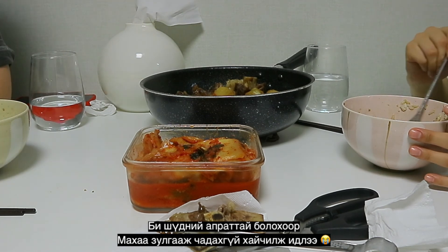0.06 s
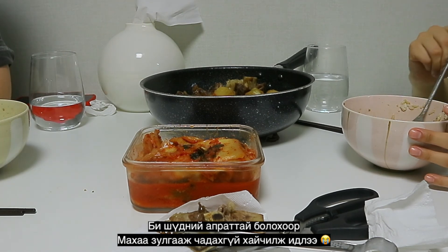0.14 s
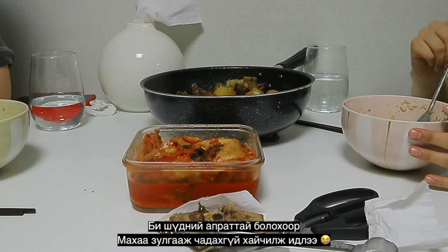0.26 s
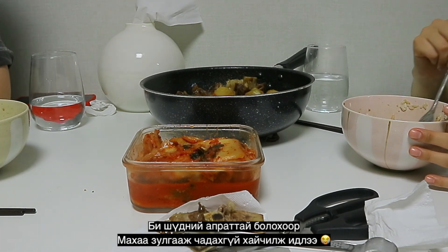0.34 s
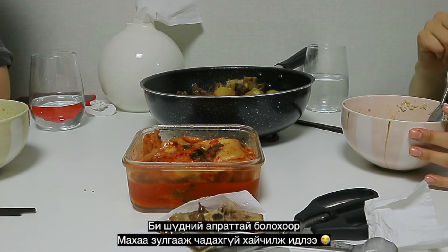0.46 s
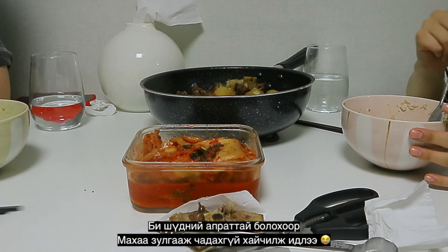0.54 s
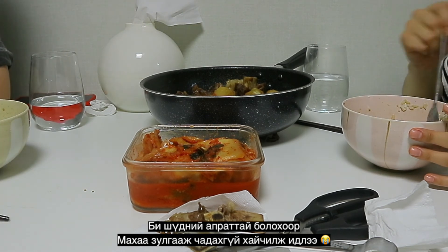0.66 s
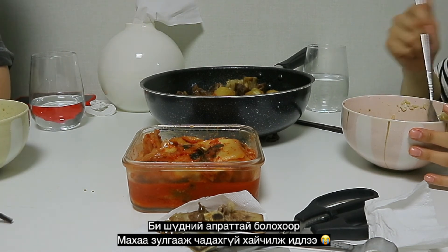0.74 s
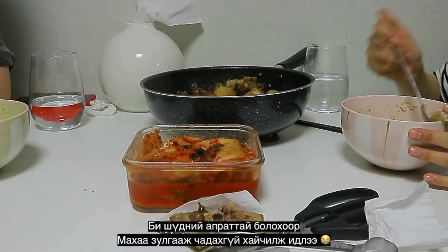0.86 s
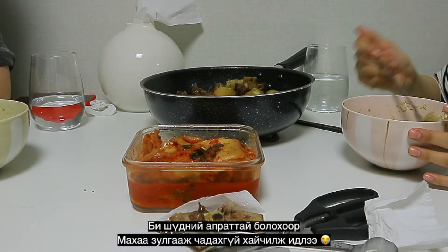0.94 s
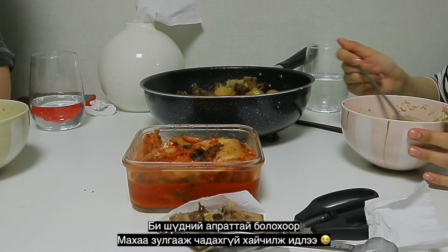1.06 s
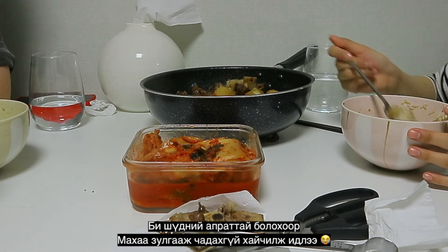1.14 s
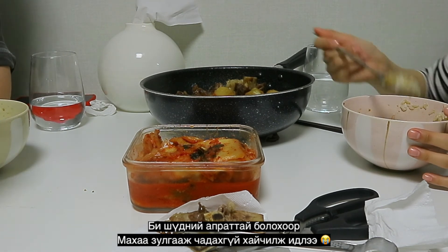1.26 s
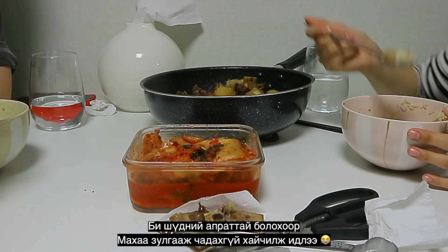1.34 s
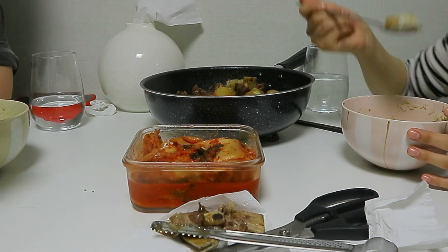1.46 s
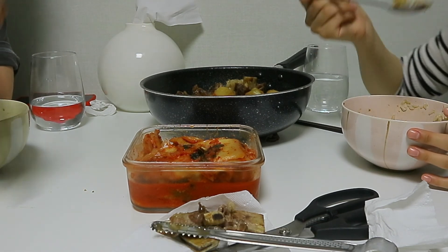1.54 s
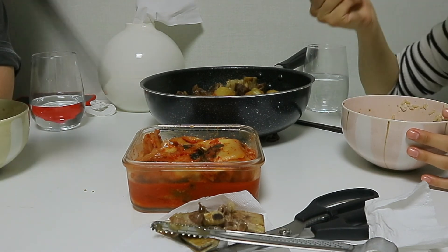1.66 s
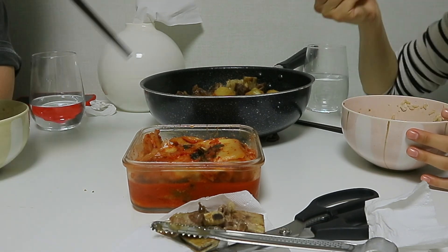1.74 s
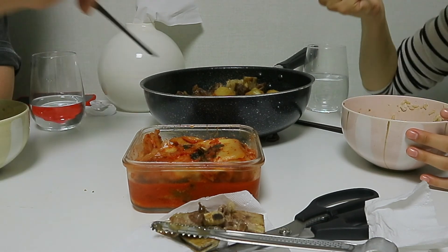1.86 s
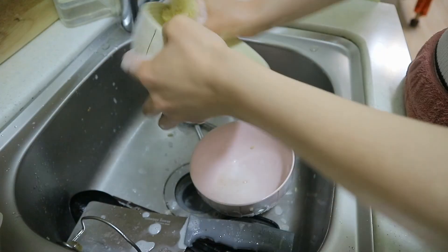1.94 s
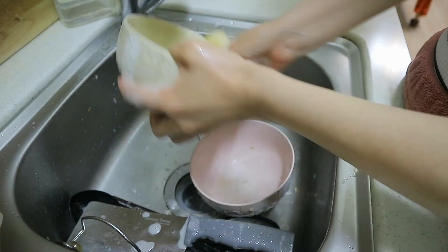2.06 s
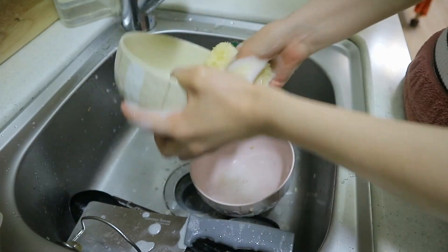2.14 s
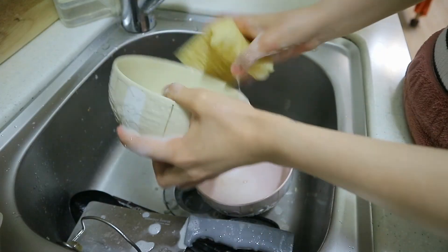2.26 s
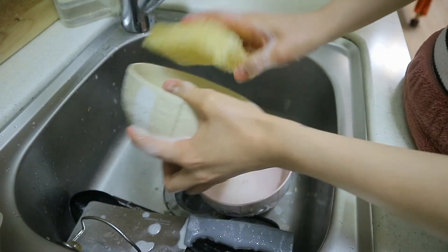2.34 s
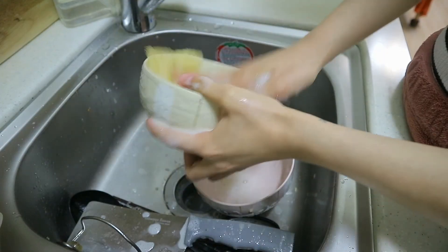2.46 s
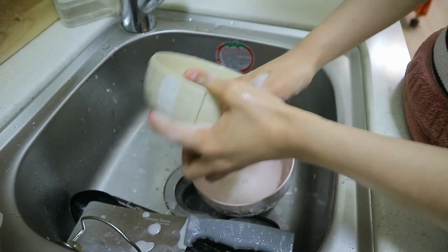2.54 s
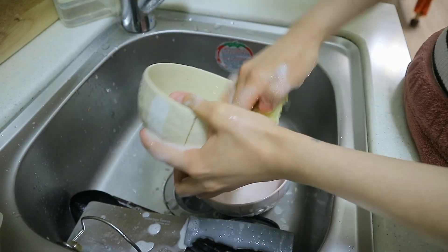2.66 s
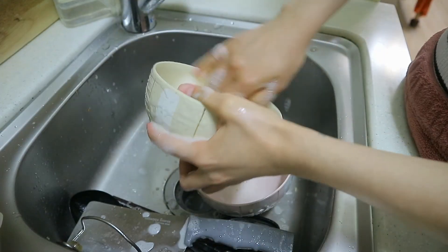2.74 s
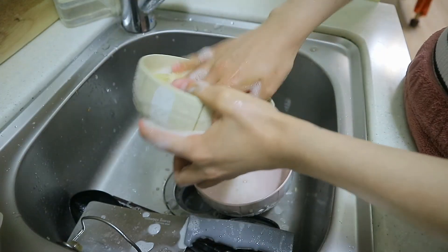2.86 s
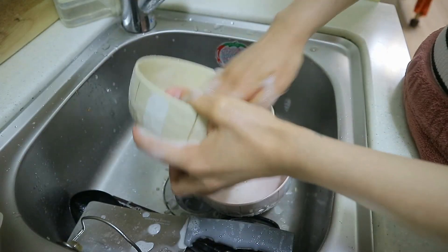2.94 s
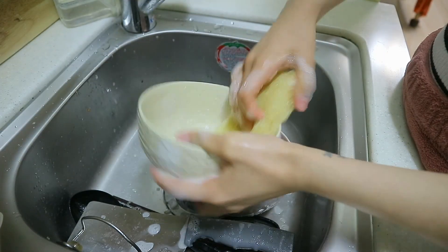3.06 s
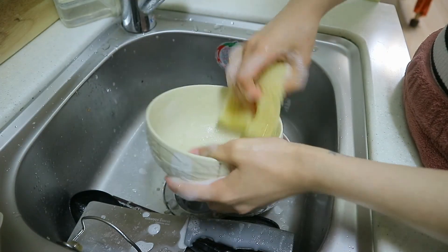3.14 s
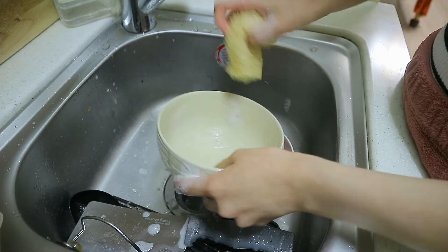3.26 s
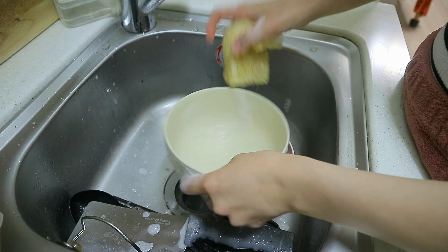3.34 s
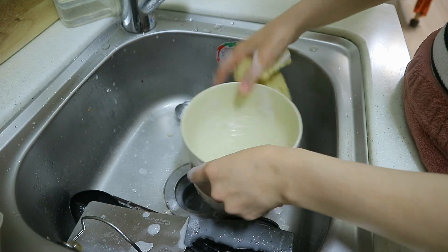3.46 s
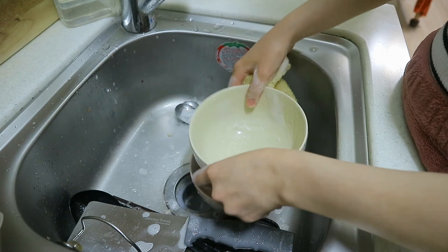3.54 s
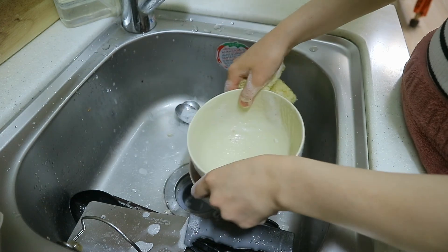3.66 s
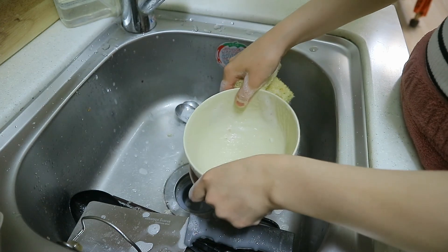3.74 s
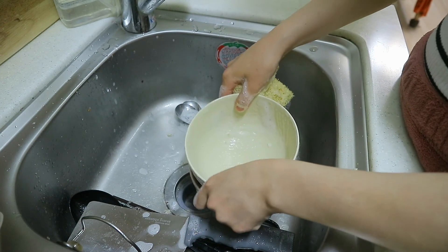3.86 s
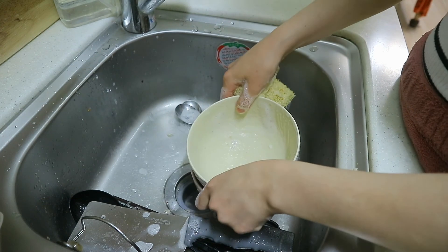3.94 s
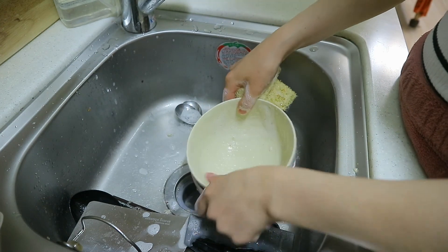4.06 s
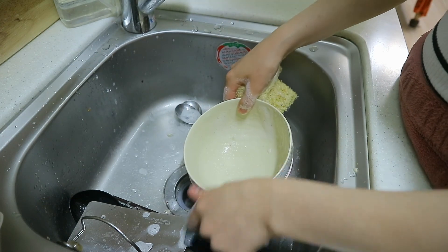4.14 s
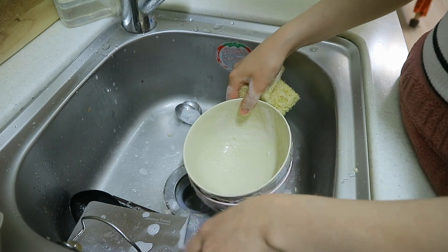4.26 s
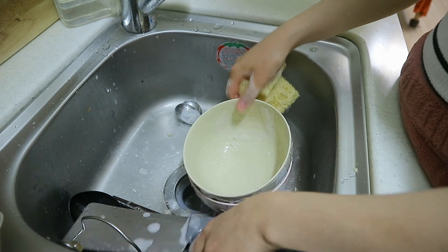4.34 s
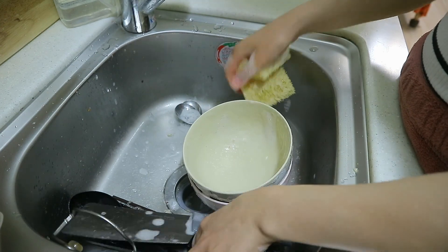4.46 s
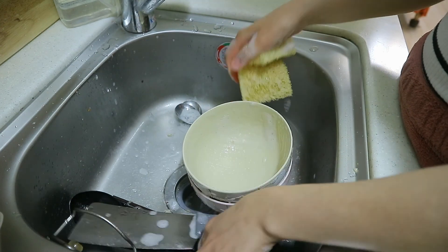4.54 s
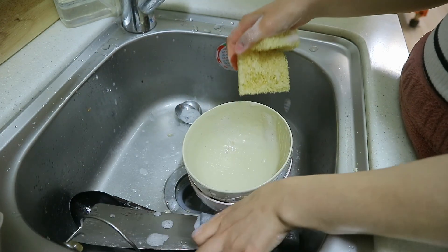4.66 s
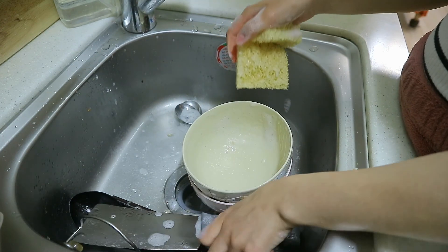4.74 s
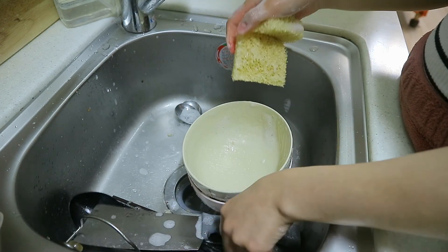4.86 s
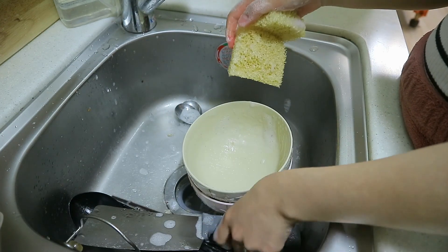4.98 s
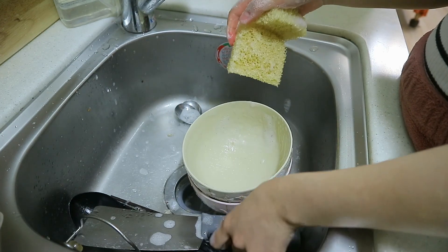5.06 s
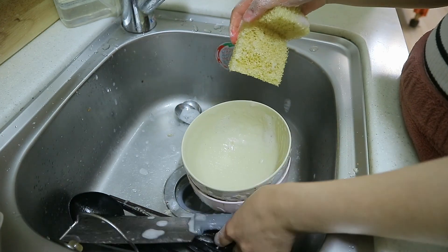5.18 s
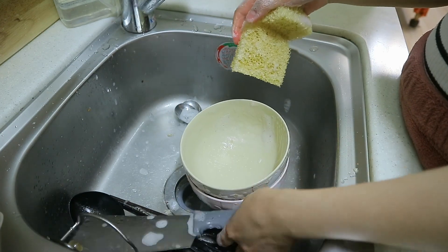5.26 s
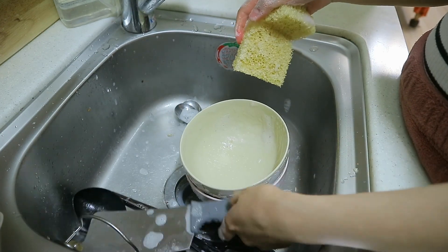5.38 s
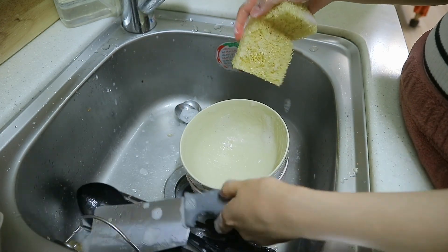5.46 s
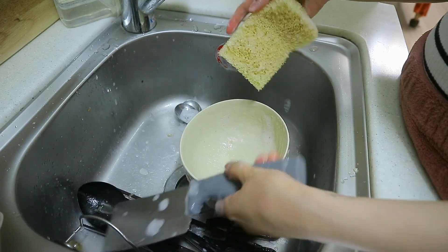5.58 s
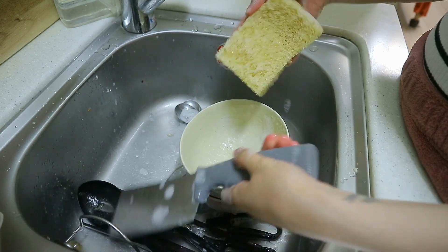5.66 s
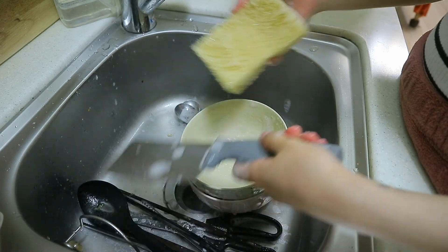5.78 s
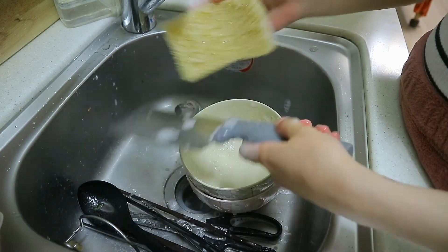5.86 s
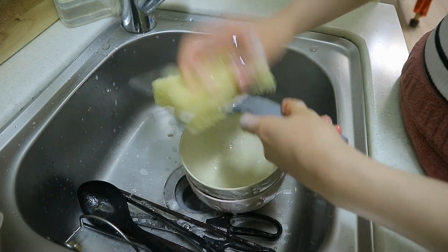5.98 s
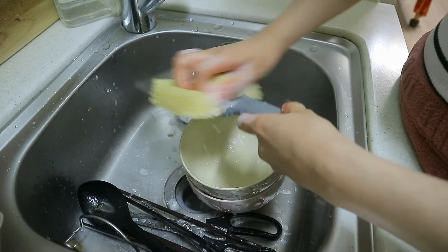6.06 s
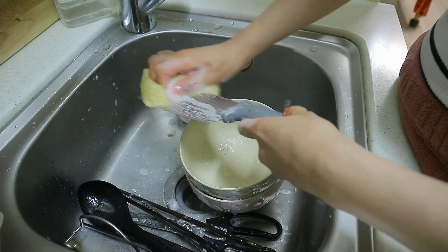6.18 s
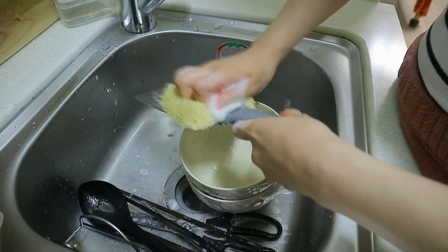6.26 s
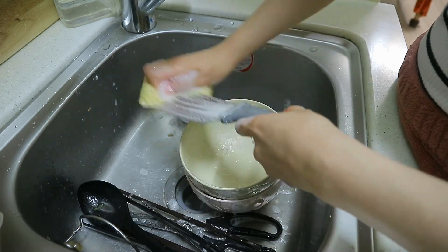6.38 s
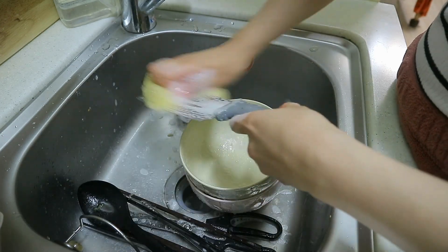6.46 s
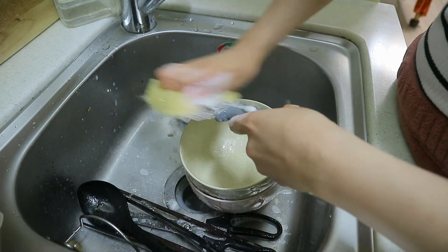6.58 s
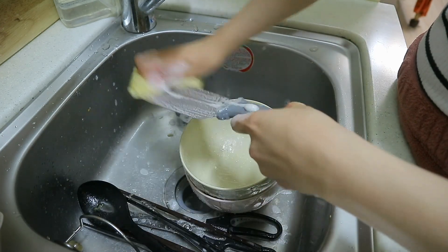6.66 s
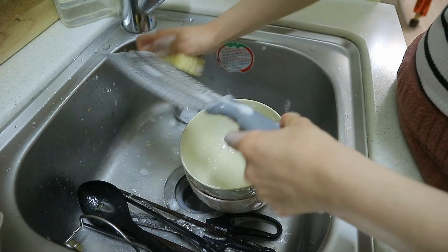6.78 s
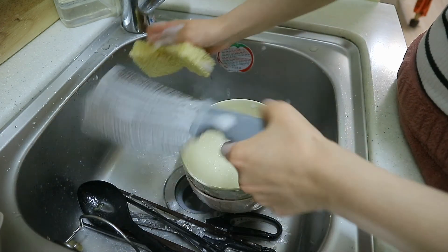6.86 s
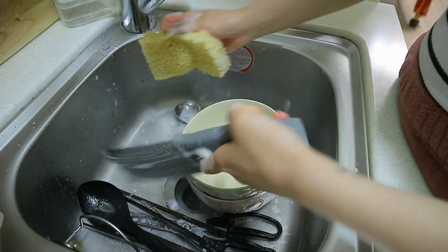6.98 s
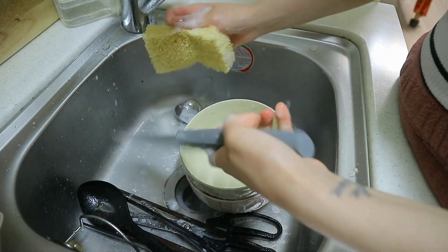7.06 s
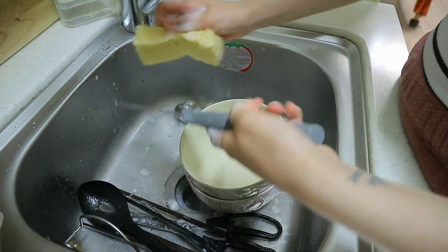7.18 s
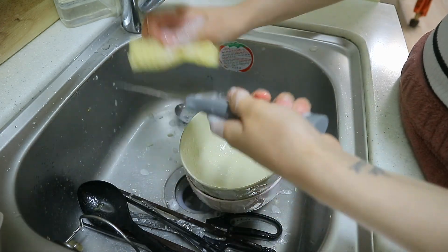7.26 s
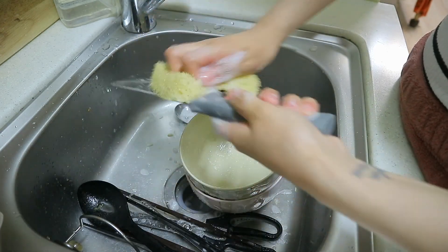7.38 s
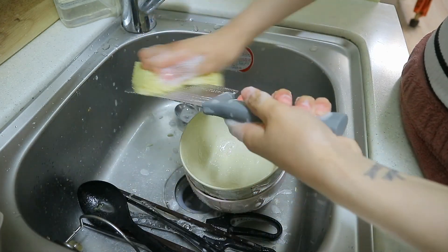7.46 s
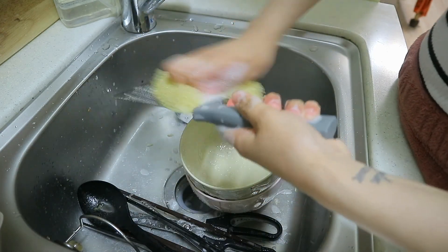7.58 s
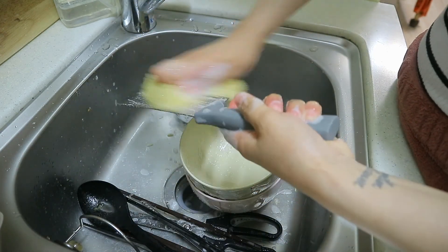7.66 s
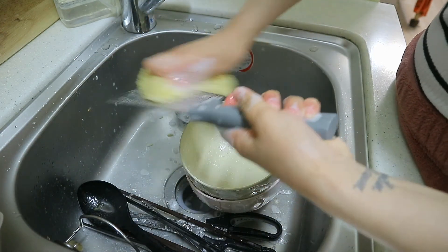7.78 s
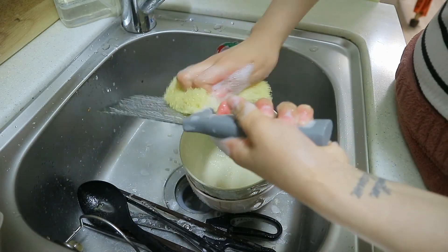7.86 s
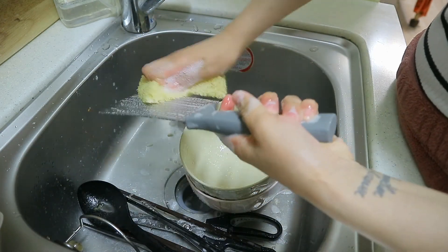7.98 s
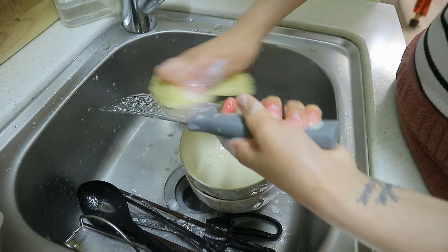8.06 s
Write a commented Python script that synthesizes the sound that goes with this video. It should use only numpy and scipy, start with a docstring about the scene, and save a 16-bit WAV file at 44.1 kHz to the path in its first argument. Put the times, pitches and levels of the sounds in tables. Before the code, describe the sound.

At a table in a small hard room, a fork briefly scrapes a china bowl, then steel tongs slide, squeal and clatter down in hard blows. Abruptly at a kitchen sink, a wet sponge softly wipes a bowl. Bowls clink sharply and settle, a knife drags through rattling utensils, its blade rings twice, and brisk sponge strokes scrub it. Close stereo microphone, faint room hush.

```python
"""Small, hard rooms heard through a close stereo pair: first a dining table, where a fork scrapes a ceramic
bowl and steel tongs clatter down. Then a steel sink, where a soapy sponge wipes a bowl, bowls are stacked,
a knife is dragged out from among the utensils, its blade rings, and the sponge scrubs it in quick strokes.
Blows are short noise bursts with decaying modes; scrapes are swells of tiny clicks that feed modes; the sponge
is bursting bubbles, filtered and pressed by the hand; squeaks are gliding tones; a faint hush lies beneath."""
import sys
import numpy as np
from scipy import signal
from scipy.fft import rfft, irfft, next_fast_len
from scipy.io import wavfile

SR = 44100
rng = np.random.default_rng(int(sys.argv[2]) if len(sys.argv) > 2 else 0)


def write(x):
    x = np.atleast_2d(x).T
    wavfile.write(sys.argv[1], SR, np.round(np.clip(x, -1, 1) * 32767).astype(np.int16))


N = 358091
TIME = np.arange(N) / SR
TOP_HZ = 15400  # upper limit of the sound
RING_SIZE = 28800  # samples in which one blow or stroke rings out
RING_T = np.arange(RING_SIZE) / SR

# ringing of the fork on china: (frequency [Hz], level [dB], t60 [s])
FORK_MODES = [(937, -15, 0.083), (1374, -18.5, 0.44), (2637, 4.5, 0.088), (4690, 5.5, 0.31),
              (4744, 2, 0.18), (7060, 1.5, 0.042), (7650, -15, 0.2), (8620, -14.5, 0.17), (9850, -15, 0.1),
              (11400, -15.5, 0.11)]
# lean of the table sounds, left minus right: (frequency [Hz], level [dB])
TABLE_BALANCE = [(500, 6.5), (1800, 1), (7000, 0.85)]
# ringing of a bowl: (frequency [Hz], level [dB], t60 [s])
BOWL_MODES = [(668, -10, .16), (1104, -13, .11), (1518, -13, .2), (1610, -7, .1), (1675, -2, .13),
              (2196, -13, .13), (2557, -5, .13), (2735, -3.5, .16), (2830, -5, .13), (3290, -17, .18),
              (3478, -17, .18), (4420, -15, .11), (4603, -8, .13), (4755, 2, .125), (4950, -9, .08),
              (7154, -22, .17), (7472, -30, .15), (9814, -26, .18), (10290, -30, .16)]
# the stack of bowls settles: (time [s], level [dB], brightness [dB/octave], ring [dB])
STACK_HITS = [(3.712, -28.5, 7, -24), (4.0916, -12, 0, -5), (4.152, -32, -3, -12)]
# ringing of the blade: (frequency [Hz], level when struck [dB], t60 when struck [s], level when scraped [dB])
BLADE_MODES = [(1052, -1, .9, -5), (1392, -10, .75, 0), (1884, -4, .23, 0), (2670, 1.5, .23, -17),
               (3478, -17, .19, -5), (3830, -14, .21, -6), (4694, -5, .17, -16), (4920, -6, .19, -2),
               (5669, -12, .13, -9), (5940, -30, .1, -8), (6476, -21, .2, -15), (7036, -16, .17, -12),
               (7510, -14, .11, -15), (8420, -20, .12, -16), (9290, -23, .17, -8), (10350, -28, .14, -13),
               (11000, -28, .15, -17), (11800, -34, .1, -19), (12800, -38, .1, -24)]
# the blade strikes and rings: (time [s], level [dB], brightness [dB/octave], ring [dB])
BLADE_HITS = [(5.4385, -13.5, -6, -6), (7.0708, -14.5, 0, -4.5)]
# colour of the blade's contacts: (frequency [Hz], level [dB])
DRAG_COLOUR = [(47, -25), (80, -17), (328, -5.5), (456, -6), (581, 8.5), (774, 0.5), (1030, 12.5),
               (1290, 3.5), (1400, 0), (1910, -1), (2600, -2.5), (4820, -6.5), (8740, -20.5), (9550, -24),
               (15500, -44)]
# ringing of the utensils: (frequency [Hz], level [dB], t60 [s])
UTENSIL_MODES = [(936, -7, 0.046), (1486, -0.5, 0.15), (1897, -3, 0.065), (2330, -5, 0.1),
                 (3610, -10.5, 0.068), (4340, -8.5, 0.082)]
# colour of squeezed foam and wet fingers: (frequency [Hz], level [dB])
SQUELCH_COLOUR = [(100, -25), (350, 0), (900, -9), (1900, -1.5), (2800, -10.5), (4300, -5), (6500, -20),
                  (15000, -36)]


def dining_table():
    """Fork and tongs share one small room, whose walls add a short tail."""
    return room(fork() + tongs(), wet_db=-7.5, t60=0.32, damping=0.029)


def fork():
    """Stick-slip clicks of the tines keep the china ringing, while the shaft judders at a slower rate."""
    # strokes: (time [s], length [s], level [dB], brightness [dB/octave], ring [dB])
    fork_scrapes = [(0, 0.076, -28.5, -3, 1.5), (.07, 0.27, -40, -3.5, -17.5), (.416, 0.11, -36, -3, -20)]
    # colour of the scrape: (frequency [Hz], level [dB])
    fork_colour = [(59, -75), (100, -32.5), (243, -25), (368, -7), (698, -25), (933, -9), (3810, -21),
                   (4780, -13.5), (5410, -35), (6930, -38), (14000, -69)]
    # low ringing of the shaft: (frequency [Hz], level [dB], t60 [s])
    shaft_modes = [(380, 16, 0.47), (943, -2, 0.29)]
    tines = rub(fork_scrapes, fork_colour, FORK_MODES, edge_s=0.003, rate=3300, spread_db=2.0)
    # one long shake under the first strokes, in the column order of fork_scrapes
    judder = [(0.0011, 0.37, -50, -17, 10)]
    shaft = rub(judder, fork_colour, shaft_modes, edge_s=0.0029, rate=180, spread_db=3.0)
    return aim(tines, TABLE_BALANCE) + pan(shaft, 13.7)


def tongs():
    """Thin steel arms slide in stick-slip, squeal on single resonances, and clatter in ringing blows."""
    # slides: (time [s], length [s], level [dB], brightness [dB/octave])
    tongs_slides = [(.51, 0.058, -28.5, 6.5), (.549, 0.037, -29, -.5), (.588, 0.029, -27.5, 3.5),
                    (.62, 0.055, -33, 8.5), (.675, 0.072, -32, 9.5), (.735, 0.092, -38, 5),
                    (.81, 0.045, -27, 6.5), (.85, 0.2, -54.5, 10), (1.06, 0.092, -23.5, -2),
                    (1.135, 0.097, -25.5, 1.5)]
    # the tongs land and rock: (time [s], level [dB], brightness [dB/octave])
    tongs_hits = [(1.0515, -12, -1), (1.083, -24, -1.5), (1.099, -19, -3), (1.154, -15, -1.5),
                  (1.412, -8.5, 0), (1.4462, -14.5, 1)]
    # squeals before pitch wander: (time [s], length [s], start [Hz], end [Hz], level [dB])
    tongs_squeals = [(.69, .12, 2010, 1760, -35), (.74, 0.12, 4060, 3510, -35),
                     (1.093, 0.048, 1890, 1878, -11), (1.19, 0.034, 2630, 2610, -25)]
    # ringing of the arms: (frequency [Hz], level [dB], t60 [s])
    tongs_modes = [(410.4, -3, 0.22), (524, -9.5, 0.26), (648.6, -5, 0.19), (819, -5, 0.063),
                   (1050, -3.5, 0.2), (1417, -4, 0.16), (1680, -7, 0.21), (1864, 1.5, 0.1),
                   (2060, -8, 0.15), (2370, -13, 0.19)]
    # colour of the slides: (frequency [Hz], level [dB])
    slide_colour = [(71, -89), (120, -40), (156, -19.5), (280, -17), (395, 7), (557, 12.5), (725, -1),
                    (1060, 5), (1330, 6), (1870, 4.5), (2300, -6), (3720, -13.5), (7860, -38.5),
                    (13800, -51.5)]
    # colour of the blows: (frequency [Hz], level [dB])
    tongs_colour = [(59, -70), (100, -24), (252, -50.5), (352, -16.5), (416, -18), (513, -22), (607, -9.5),
                    (748, -17), (1090, -10.5), (1190, -17), (1730, -13.5), (1880, -5.5), (2230, -22.5),
                    (4180, -37.5), (15000, -73.5)]
    slide = rub(with_ring(tongs_slides, -4), slide_colour, tongs_modes,
                edge_s=0.004, rate=2000, spread_db=2.0, detune=.06)
    slide = shifting(slide, lag_s=.00105, echo_db=-5, rate=14, swing_db=.7)
    clatter = strike(with_ring(tongs_hits, -12.5), tongs_colour, tongs_modes, crack_s=0.0068, wash_db=-11.5,
                     t60=0.28, damping=0.11, ring_tilt_db=1.5, detune=.035, scatter_db=3)
    # narrow steel arms radiate little bass
    bass_cut = signal.butter(3, 310, "high", fs=SR, output="sos")
    thin = signal.sosfilt(bass_cut, slide + clatter + 1e-18)
    steel = overtones(thin, db=-6, t60=0.079, low_hz=2525, count=22, size=2)
    return aim(steel + squeals(tongs_squeals, width_hz=97), TABLE_BALANCE)


def cutlery():
    """Light touches of metal on china: short cracks that excite the fork's modes to differing degrees."""
    # touches: (time [s], level [dB], brightness [dB/octave], ring [dB])
    cutlery_ticks = [(0, -41, 2, 18), (0.512, -31.5, 19.5, 2.5), (1.3655, -38, -6.5, -16),
                     (1.775, -36.5, -2.5, -37), (2.494, -39.5, -7.5, -19)]
    # colour of the touches: (frequency [Hz], level [dB])
    tick_colour = [(200, -21.5), (1000, -20), (2000, 0.5), (4000, 8.5), (5000, 1.5), (6500, 1.5),
                   (10000, -14.5), (15000, -24)]
    return strike(cutlery_ticks, tick_colour, FORK_MODES, crack_s=0.011, wash_db=-4.5, t60=0.25, damping=0.0211)


def knife():
    """The knife rasps over steel and utensils in stick-slip, and its edge grates."""
    # drags: (time [s], length [s], level [dB], brightness [dB/octave])
    blade_drags = [(4.428, 0.13, -35, 0), (4.521, 0.23, -37, -3), (4.918, 0.13, -50, -11),
                   (5.145, 0.11, -32.5, -2.5), (5.312, 0.142, -24, 1), (5.44, 0.108, -36.5, 1),
                   (5.551, 0.17, -35.5, -1)]
    drags = rub(with_ring(blade_drags, -8.5), DRAG_COLOUR, UTENSIL_MODES,
                edge_s=.01, rate=1200, spread_db=3, detune=.08)
    return shifting(drags, lag_s=.00055, echo_db=-5, rate=25, swing_db=2) + grating()


def grating():
    """The edge slips in tiny catches, which feed the high modes of the blade, damped by the contact."""
    # the edge catches and sings: (time [s], length [s], level [dB], brightness [dB/octave])
    blade_grates = [(5.314, 0.055, -28, -2), (5.364, 0.048, -28, 3.5), (5.397, 0.028, -20.5, 2.5),
                    (5.556, 0.043, -28, -9), (5.602, 0.044, -33.5, -2)]
    damped_t60_s = .07
    damped_modes = [(hz, scraped_db, damped_t60_s) for hz, _, _, scraped_db in BLADE_MODES]
    out = np.zeros((2, N))
    for s, length, db, tilt in blade_grates:
        body = ring(damped_modes, tilt, detune=.005, scatter_db=2)
        swell = np.sqrt(np.sin(np.pi * np.minimum(RING_T / length, 1)))
        slips = grains(RING_SIZE, rate=1500, spread_db=2)[:1] * swell
        add(out, s, amp(db) * signal.fftconvolve(slips, unit_energy(body), axes=1))
    return out


def blade_blows():
    """The blade strikes something and its modes ring on, close to the microphone and without a room tail."""
    struck_modes = [(hz, db, t60) for hz, db, t60, _ in BLADE_MODES]
    return strike(BLADE_HITS, DRAG_COLOUR, struck_modes, crack_s=0.011, wash_db=-10,
                  t60=0.25, damping=0.22, ring_tilt_db=0.5)


def sponge():
    """Wet foam crackles and squeaks: hollow wipes inside the bowl, then brisk strokes along the blade."""
    # squeaks before pitch wander: (time [s], length [s], start [Hz], end [Hz], level [dB])
    sponge_squeaks = [(1.94, 0.061, 770, 692, -37.5), (2.49, 0.13, 1624, 1470, -45),
                      (2.78, 0.047, 1544, 1500, -41), (2.79, 0.041, 774, 733, -39),
                      (6.08, 0.034, 1260, 1417, -42)]
    return sponge_in_bowl() + sponge_on_blade() + squeals(sponge_squeaks, width_hz=102)


def sponge_in_bowl():
    """Each sweep presses in, holds and eases off; the hollow wipe fades sooner than the bright fizz."""
    # sweeps round the bowl: (time [s], hold [s], level [dB])
    sponge_sweeps = [(1.906, 0.19, -43), (2.473, 0.61, -44)]
    # wet fingers tick on the bowl: (time [s], level [dB])
    finger_ticks = [(2.295, -54), (2.412, -50), (3.263, -47.5), (3.335, -56.5), (4.359, -58)]
    # colour of the wipe: (frequency [Hz], level [dB])
    wipe_colour = [(150, -67), (229, -38.5), (262, -35.5), (318, -15), (425, -30), (624, -6), (742, -5.5),
                   (1050, -7), (1800, -5), (3030, -20), (4720, -24.5), (5300, -35), (9820, -53.5),
                   (15000, -67)]
    attack_s, fade_db_per_s = 0.0087, 73
    pressure = np.zeros(N)
    for s, hold, db in sponge_sweeps:
        press = np.clip((TIME - s) / attack_s, 0, 1)
        pressure += press * amp(db - fade_db_per_s * np.maximum(TIME - s - hold, 0))
    wipe = foam(pressure, wipe_colour, tilt=-1.2, rate=3500, spread_db=1.5, rough_db=5.0)
    # the square root makes the fizz fade half as fast in dB
    fizz = foam(amp(-30) * np.sqrt(pressure), wipe_colour, tilt=12, rate=4000, spread_db=1.5, rough_db=2.2)
    # the colour shifts as the hand circles
    circling = shifting(wipe + fizz, lag_s=.00125, echo_db=-6, rate=7, swing_db=1.2)
    touches = [(s, db, 0, -5) for s, db in finger_ticks]
    ticks = strike(touches, SQUELCH_COLOUR, BOWL_MODES, crack_s=0.0082, wash_db=-4, t60=0.09, damping=0.05)
    return resound(circling, BOWL_MODES, db=-27.5) + ticks


def sponge_on_blade():
    """Strokes that ease off as the hand turns; foam pops, fizzes most mid-stroke, and now and then squelches."""
    # to-and-fro strokes: (time [s], length [s], level [dB])
    scrub_strokes = [(5.998, 0.051, -48), (6.056, 0.15, -43), (6.204, 0.11, -45), (6.324, 0.13, -44),
                     (6.457, 0.071, -43.5), (6.576, 0.22, -40.5), (7.309, 0.096, -44), (7.426, .1, -39),
                     (7.544, 0.085, -40), (7.668, 0.11, -41), (7.781, 0.11, -40.5), (7.905, 0.14, -40),
                     (8.044, 0.1, -42.5)]
    # foam squeezed out against the blade: (time [s], level [dB])
    squelches = [(6.027, -39.5), (6.284, -39.5), (6.54, -36.5), (7.617, -43)]
    # colour of the scrubbing: (frequency [Hz], level [dB])
    scrub_colour = [(150, -24), (225, -11.5), (263, -19), (332, -15), (550, -1), (695, -8), (844, 0.5),
                    (1060, -4.5), (1200, -2), (1940, -1.5), (2600, -8.5), (4390, -8.5), (10500, -24.5),
                    (15500, -33)]
    turn_s, squelch_s = 0.013, 0.02  # pressure reaches this far past each stroke; length of a squelch
    pressure = sum(amp(db) * arch(s - turn_s, length + 2 * turn_s) for s, length, db in scrub_strokes)
    frothing = sum(amp(db - 8.5) * arch(s, length) ** 2 for s, length, db in scrub_strokes)
    squeezing = sum(amp(db) * arch(s, squelch_s) for s, db in squelches)
    scrub = foam(amp(-1.5) * pressure, scrub_colour, tilt=0.3, rate=2500, spread_db=1.5, rough_db=2.6)
    fizz = foam(frothing, scrub_colour, tilt=2.4, rate=5500, spread_db=3.0, rough_db=4.0)
    squelch = foam(squeezing, SQUELCH_COLOUR, tilt=0, rate=2500, spread_db=1.5, rough_db=1.5)
    pops = bubbles(amp(3.5) * pressure, per_s=350, low_hz=600, high_hz=5500, cycles=4, spread_db=20)
    moving = shifting(scrub + fizz, lag_s=.0005, echo_db=-9, rate=12, swing_db=1.5)
    return moving + squelch + pops


def bowls():
    """One bowl clinks and chatters into the other in ringing blows, then the stack settles on the steel."""
    # colour of the clinks: (frequency [Hz], level [dB])
    bowl_colour = [(80, -28), (244, -30), (669, -2.5), (930, -22), (1680, -0.5), (2380, -15.5), (3540, -19),
                   (4100, -27.5), (4800, -15.5), (5980, -54), (6970, -33), (15000, -66)]
    # lean of the clinks, left minus right: (frequency [Hz], level [dB])
    clink_balance = [(600, 0.5), (2400, 0.5), (4400, -0.5), (9000, 1)]
    # ringing of the stack: (frequency [Hz], level [dB], t60 [s])
    stack_modes = [(405, 7, 0.14), (580, -9, 0.3), (1045, -6, .25), (1410, 0, 0.08), (1502, -5, 0.12),
                   (1840, -2, 0.12), (2078, -7, 0.14), (2681, -1, 0.14), (3356, -1, 0.18), (4640, -7, .08),
                   (7400, -21, .15)]
    # colour of the settling stack: (frequency [Hz], level [dB])
    stack_colour = [(35, -60), (60, -43), (120, -1.5), (186, -17.5), (390, -5), (526, -21), (695, -5.5),
                    (938, -11.5), (1390, -7), (2840, -20.5), (3420, -15.5), (4730, -22.5), (15000, -57.5)]
    clinks = strike(chatter(count=5), bowl_colour, BOWL_MODES, crack_s=0.0055, wash_db=-18,
                    t60=0.14, damping=.1, ring_tilt_db=0.5, detune=.006)
    stack = strike(STACK_HITS, stack_colour, stack_modes, crack_s=0.007, wash_db=1.0,
                   t60=0.045, damping=0.03, ring_tilt_db=1.0)
    return aim(clinks, clink_balance) + pan(stack, 0.83)


def chatter(count):
    """The landing of a bowl and its quick, weakening, unevenly spaced bounces, as rows for strike()."""
    landing_s, gap_s = 3.8971, 0.0115
    blows = [(landing_s, -8, -2.5, -5)]
    for k in range(count):
        bounce_s = landing_s + gap_s * (k + 1 + 0.17 * rng.standard_normal())
        blows.append((bounce_s, -23.5 - 1.5 * k, 1, 2))
    return blows


def china_squeak():
    """Wet china slips with a short, swelling, falling tone."""
    length_s, start_hz, end_hz = 0.033, 582, 410
    progress = np.linspace(0, 1, int(length_s * SR))
    phase = 2 * np.pi * np.cumsum(start_hz + (end_hz - start_hz) * progress) / SR
    swell = np.sin(np.pi * progress ** 2)
    out = np.zeros((2, N))
    add(out, 4.062, amp(-25) * swell * np.sin(phase)[None])
    return out


def utensils():
    """Ladles and other utensils knock together as the knife pushes past, each blow with its own pitch."""
    # knocks: (time [s], level [dB], brightness [dB/octave])
    utensil_knocks = [(4.428, -30, 2.5), (4.457, -27.5, 1), (4.5205, -25.5, -1), (4.597, -31.5, 0),
                      (4.666, -36.5, 3), (4.705, -33.5, 0.5), (4.917, -36, 5.5), (4.93, -42, -5.5),
                      (4.974, -32, -5), (5.014, -35.5, -9.5), (5.093, -43.5, -11), (5.145, -35, 5.5),
                      (5.205, -32, 2.5), (5.315, -27, 0.5), (5.345, -33, 4.5), (5.373, -25, -1),
                      (5.697, -36, 5)]
    # colour of the knocks: (frequency [Hz], level [dB])
    utensil_colour = [(60, -57), (250, -28), (600, -2.5), (1200, -1), (1900, 2), (2900, -7.5), (4400, -15),
                      (7000, -20), (10000, -29), (15000, -43)]
    return strike(with_ring(utensil_knocks, -2), utensil_colour, UTENSIL_MODES, crack_s=0.0052, wash_db=-5.5,
                  t60=0.18, damping=0.069, detune=.08, scatter_db=4)


def sink():
    """Knocks ring the steel sheet, each at its own spot, and pass a share of their force to the booming basin."""
    # knocks: (time [s], level [dB], brightness [dB/octave], boom relative to level [dB], ring [dB])
    sink_knocks = [(2.916, -27, -1, -26, -20), (3.677, -36.5, 1, 2.5, 1), (3.712, -24, 0.5, -0.5, -2),
                   (4.456, -40.5, 6.5, 3, -4), (4.519, -19.5, 1.5, -12, -3.5), (4.547, -26, -7.5, -8, 2.5),
                   (4.621, -32.5, -7.5, -9, 1.5), (4.87, -39.5, -24, -3, 3), (4.925, -24, 1, -13.5, -11),
                   (5.205, -26.5, 3.5, -28, -6), (5.296, -35, -13, -24, 5), (5.316, -25.5, 2.5, -13.5, -4),
                   (5.488, -30, -4, -30, 3), (5.697, -35.5, -1, -4, 4), (6.475, -47.5, -3.5, -8, 0.5),
                   (6.648, -37.5, -12, -23, -10), (6.775, -40.5, -4.5, -32, -8), (7.477, -45, -12, -24, -9),
                   (7.575, -50.5, -17, -7, -9), (7.939, -41.5, 5.5, -9.5, -4)]
    # ringing of the sheet: (frequency [Hz], level [dB], t60 [s])
    sink_modes = [(429, -15, 0.14), (580, 1, 0.23), (660, 5.5, 0.13), (873, -7.5, 0.18), (1420, -7, 0.11),
                  (1870, 2, 0.088)]
    # colour of the knocks: (frequency [Hz], level [dB])
    sink_colour = [(80, -41), (205, -36.5), (279, -18.5), (610, 4), (770, -20.5), (890, -3.5), (1290, -7),
                   (1790, -11.5), (2970, -23), (4600, -37), (8120, -47), (15000, -83)]
    # low ringing of the basin: (frequency [Hz], level [dB], t60 [s])
    basin_modes = [(127, 5, 0.24), (84, -14, 0.15), (190, -3, 0.14), (306, -10, 0.2)]
    # colour of the boom: (frequency [Hz], level [dB])
    basin_colour = [(30, -30), (70, -14), (130, -5.5), (300, -6.5), (600, -2), (1200, -33), (4000, -53)]
    blows = [(s, db, tilt, ring_db) for s, db, tilt, _, ring_db in sink_knocks]
    knocks = strike(blows, sink_colour, sink_modes, crack_s=0.013, wash_db=-7.5, t60=0.31, damping=0.037,
                    ring_tilt_db=-2.5, detune=.09, scatter_db=4)
    thumps = [(s, db + boom_db, 0) for s, db, _, boom_db, _ in sink_knocks]
    # the stack and the blade also reach the basin, the blade 12 ms late
    thumps += [(s, db - 20, 0) for s, db, *_ in STACK_HITS]
    thumps += [(s + 0.012, db - 15.5, 0) for s, db, *_ in BLADE_HITS]
    booms = strike(with_ring(thumps, -7), basin_colour, basin_modes, crack_s=0.023, wash_db=-18.5,
                   t60=0.4, damping=0.16)
    return pan(knocks, 1.5) + pan(booms, 4.8)


def air():
    """The quiet background of each room: steady noise in that room's colour, with a quick crossfade."""
    # colour of the dining room's hush: (frequency [Hz], level [dB])
    dining_air = [(30, -35), (129, -15.5), (328, -17), (645, -17.5), (837, -15), (928, -22.5), (1830, -26),
                  (2310, -33), (8920, -47.5), (15000, -74)]
    # colour of the kitchen's hush: (frequency [Hz], level [dB])
    kitchen_air = [(30, -23.5), (129, -7.5), (296, -14), (415, -3.5), (1030, -12), (1110, -11), (2250, -16),
                   (4650, -25.5), (12500, -44), (15000, -96)]
    kitchen = np.clip((TIME - 1.9) / 0.046, 0, 1)
    noise = pair(rng.standard_normal((2, next_fast_len(N, True))))
    dining_hush = colour(noise, dining_air)[:, :N]
    kitchen_hush = colour(noise, kitchen_air)[:, :N]
    return pan(amp(-52.5) * (1 - kitchen) * dining_hush, 2.8) + amp(-55.5) * kitchen * kitchen_hush


def strike(hits, spectrum, modes, crack_s, wash_db, t60, damping, ring_tilt_db=0, detune=0.00061, scatter_db=0):
    """Each blow: a short crack of noise, a wash of dense resonances and the object's clear modes."""
    out = np.zeros((2, N))
    fade = np.minimum(2 * (1 - RING_T / RING_T[-1]), 1) ** 2
    for s, db, tilt, ring_db in hits:
        crack = colour(burst(crack_s), spectrum, tilt)
        crack *= np.sqrt(crack_s * SR / np.sum(crack ** 2) * 2)
        tail = amp(wash_db) * colour(wash(t60, damping), spectrum, tilt)
        clear = amp(ring_db) * ring(modes, ring_tilt_db + tilt, detune, scatter_db)
        add(out, s, amp(db) * fade * (crack + tail + clear))
    return out


def rub(strokes, spectrum, modes, edge_s, rate, spread_db, detune=0.00095):
    """Each stroke: a swell of stick-slip clicks that keeps the modes ringing, differently at each place."""
    out = np.zeros((2, N))
    for s, length, db, tilt, ring_db in strokes:
        body = unit_energy(ring(modes, detune=detune, scatter_db=3))
        edge = min(edge_s, length / 2)
        from_ends = np.minimum(RING_T, length - RING_T)
        pressure = np.sin(np.pi / 2 * np.clip(from_ends / edge, 0, 1))
        pressure *= unevenness(RING_T, rate=70, depth_db=2.5)
        slips = grains(RING_SIZE, rate, spread_db) * pressure
        ringing = signal.fftconvolve(slips[:1], body, axes=1)[:, :RING_SIZE]
        add(out, s, amp(db) * (colour(slips, spectrum, tilt) + amp(ring_db) * ringing))
    return out


def squeals(rows, width_hz):
    """Stick-slip briefly locks on to one resonance: a rough, gliding tone whose pitch wanders by width_hz."""
    out = np.zeros((2, N))
    for s, length, start_hz, end_hz, db in rows:
        t = np.arange(int(length * SR)) / SR
        glide = np.linspace(start_hz, end_hz, len(t))
        wander = width_hz * np.log(unevenness(t, rate=400, depth_db=8))
        phase = 2 * np.pi * np.cumsum(glide + wander) / SR
        swell = np.sin(np.pi * t / length) * unevenness(t, rate=150, depth_db=3)
        right_lag = min(start_hz / 1500, 2)  # radians
        add(out, s, amp(db) * swell * np.array([np.sin(phase), np.sin(phase - right_lag)]))
    return out


def foam(pressure, spectrum, tilt, rate, spread_db, rough_db):
    """Tiny bubbles burst, as loud as the sponge is pressed."""
    size = next_fast_len(N, True)
    grip = unevenness(TIME, rate=70, depth_db=rough_db)
    pops = grains(size, rate, spread_db) * np.pad(pressure * grip, (0, size - N))
    return colour(pops, spectrum, tilt)[:, :N]


def bubbles(pressure, per_s, low_hz, high_hz, cycles, spread_db):
    """Larger soap bubbles pop in short, rising pings, louder under a firmer hand."""
    out = np.zeros((2, N))
    for when, small, weak, place in rng.random((int(per_s * N / SR), 4)):
        i = int(when * N)
        if pressure[i] > 0:
            hz = low_hz * (high_hz / low_hz) ** small
            age = np.arange(0, 2 * np.pi, hz / cycles / SR)  # in decay times
            phase = 2 * np.pi * cycles * age * (1 + age / 20)
            right_phase = phase * (1 + (place - .5) * small / 2)
            level = pressure[i] * amp(-spread_db * weak)
            add(out, i / SR, level * np.exp(-age) * np.sin([phase, right_phase]))
    return out


def overtones(x, db, t60, low_hz, count, size):
    """Thin steel sings in many irregular high modes; which of them sound changes as the contact point slides."""
    spots = np.array([unevenness(TIME, rate=18, depth_db=12) for _ in range(size)])
    spots /= np.sqrt(np.sum(spots ** 2, axis=0))
    out = x
    for share in spots:
        place = (np.arange(count) + rng.random(count)) / count
        hz = low_hz * (TOP_HZ / low_hz) ** place
        body = unit_energy(ring([(f, 0, t60) for f in hz], tilt=3, scatter_db=5.5))
        singing = signal.fftconvolve(np.float32(x * share), np.float32(body), axes=1)[:, :N]
        out = out + amp(db) * singing
    return out


def resound(x, modes, db):
    """A damped object adds a little of its ring to whatever rubs it."""
    body = unit_energy(ring(modes))
    return x + amp(db) * signal.fftconvolve(x[:1], body, axes=1)[:, :N]


def shifting(x, lag_s, echo_db, rate, swing_db):
    """A surface near a moving contact reflects it with a changing lag, so peaks glide through the spectrum."""
    lag = lag_s * unevenness(TIME, rate, swing_db)
    echo = np.array([np.interp(TIME - lag, TIME, side) for side in x])
    return (x + amp(echo_db) * echo) / np.hypot(1, amp(echo_db))


def ring(modes, tilt=0, detune=0.00089, scatter_db=0):
    """Decaying modes of unit initial power, varied by where the blow lands; high ones differ more in phase."""
    hz, db, t60 = np.transpose(modes)
    gain = amp(db + tilt * np.log2(hz / hz[0]) + scatter_db * rng.standard_normal(len(hz)))
    gain /= np.sqrt(np.sum(gain ** 2) / 2)
    # phase lead of one channel, on alternate sides from mode to mode
    skew = (-1) ** np.arange(len(hz)) * np.minimum(hz / 2600, .8)
    t = np.float32(RING_T)
    detuned_hz = hz * (1 + detune * rng.standard_normal(len(hz)))
    phase = np.outer(np.float32(2 * np.pi * detuned_hz), t)
    decay = np.exp(-np.minimum(np.outer(np.float32(np.log(1000) / t60), t), 20))
    mid = np.float32(gain * np.cos(skew)) @ (decay * np.sin(phase))
    side = np.float32(gain * np.sin(skew)) @ (decay * np.cos(phase))
    return np.array([mid + side, mid - side], float)


def wash(t60, damping):
    """Dense decaying resonances in octave bands; positive damping makes the treble die sooner."""
    hz = np.fft.rfftfreq(RING_SIZE, 1 / SR)
    octave = np.float32(np.clip(np.log2((hz + 1) / 1000), -3, 4))
    noise = rfft(np.float32(pair(rng.standard_normal((2, RING_SIZE)))))
    lost = np.float32(np.log(1000) * RING_T / t60)
    out = 0
    for k in range(-3, 5):
        band = irfft(noise * np.maximum(1 - abs(octave - k), 0))
        out = out + band * np.exp(-np.minimum(lost * float(2 ** (damping * k)), 20))
    return out


def burst(length_s):
    """A short burst of noise that opens each blow, lasting some milliseconds, spread evenly over all frequencies."""
    envelope = np.exp(-(RING_T / length_s) ** 4)
    x = rng.standard_normal((2, RING_SIZE)) * envelope
    for _ in range(2):
        # flatten the spectrum, then shorten again
        x = irfft(np.exp(1j * np.angle(rfft(x)))) * envelope
    return pair(x)


def grains(size, rate, spread_db):
    """Dense tiny clicks of very unequal size, at unit power: slipping contacts or bursting foam."""
    clicks = (rng.random(size) < rate / SR) * amp(spread_db * np.minimum(rng.exponential(size=size), 5))
    x = clicks * rng.standard_normal((2, size))
    return pair(x / np.sqrt(np.mean(x ** 2) + 1e-12))


def unevenness(t, rate, depth_db):
    """Wandering gain of a contact that catches and lets go, with rate new random levels a second."""
    knots = np.arange(0, t[-1], 1 / rate)
    return amp(depth_db * np.interp(t, knots, rng.standard_normal(len(knots))))


def arch(s, length):
    """A smooth rise and fall from time s."""
    out, i, size = np.zeros(N + SR), int(s * SR), int(length * SR)
    out[i:i + size] = np.sin(np.linspace(0, np.pi, size, endpoint=False))
    return out[:N]


def room(x, wet_db, t60, damping):
    """Hard walls close by return a short diffuse tail."""
    echo = wash(t60, damping) * np.clip(RING_T / 0.0024 - .4, 0, 1)
    return x + amp(wet_db) * signal.fftconvolve(x, unit_energy(echo), axes=1)[:, :N]


def colour(x, points, tilt=0):
    """Causal minimum-phase filter of unit power: a spectrum, tilted in dB per octave about 1 kHz."""
    size = x.shape[-1]
    hz = np.fft.rfftfreq(size, 1 / SR)
    gain = contour(points, hz) * amp(tilt * np.log2(np.clip(hz, 300, 7000) / 1000))
    # folding the cepstrum on to positive times makes the filter causal
    cepstrum = irfft(np.log(gain / np.sqrt(np.mean(gain ** 2))), size)
    cepstrum[1:size // 2] *= 2
    cepstrum[size // 2:] = 0
    return irfft(rfft(x) * np.exp(rfft(cepstrum)), size)


def pair(x):
    """Two unrelated noises become left and right: alike in the bass, opposed in the treble."""
    # side minus mid of the microphone pair: (frequency [Hz], level [dB])
    pair_width = [(60, -9), (250, -6), (1000, -4), (2000, -1), (3000, 4), (6000, 1.5), (14000, 1)]
    size = x.shape[1]
    width = contour(pair_width, np.fft.rfftfreq(size, 1 / SR))
    mid, side = rfft(x) / np.sqrt(1 + width ** 2)
    return irfft(np.array([mid + width * side, mid - width * side]), size)


def aim(x, balance):
    """An object sends each part of its spectrum in its own direction."""
    size = next_fast_len(N, True)
    lean = np.sqrt(contour(balance, np.fft.rfftfreq(size, 1 / SR)))
    return irfft(rfft(x, size) * np.array([lean, 1 / lean]), size)[:, :N]


def pan(x, left_db):
    """Shift a sound towards the left; left_db is left minus right."""
    return x * amp(np.array([[left_db], [-left_db]]) / 2)


def contour(points, hz):
    """Gain of (Hz, dB) points joined on a log-frequency axis."""
    f, db = np.transpose(points)
    return amp(np.interp(np.log(hz + 1), np.log(f), db))


def unit_energy(body):
    """Scale a stereo response to an average energy of one per channel."""
    return body / np.sqrt(np.sum(body ** 2) / 2)


def with_ring(rows, ring_db):
    """Give every row the same ring level."""
    return [(*row, ring_db) for row in rows]


def add(out, s, sound):
    """Mix a sound in at time s."""
    i = max(int(s * SR), 0)
    out[:, i:i + sound.shape[1]] += sound[:, :N - i]


def amp(db):
    """Decibels to gain."""
    return 10 ** (np.asarray(db) / 20)


def scene():
    """The meal, then the washing-up."""
    meal = dining_table() + cutlery()
    at_sink = knife() + sponge() + bowls() + china_squeak() + utensils() + sink()
    washing_up = room(at_sink, wet_db=-5.5, t60=0.21, damping=0.25) + blade_blows()
    return meal + washing_up + air()


def record(dry):
    """Thin the deepest bass, round the highest peaks and cut the top."""
    thinned = signal.sosfilt(signal.butter(2, 55, "high", fs=SR, output="sos"), dry)
    rounded = 1.3 * np.tanh(thinned / 1.3)
    return signal.sosfilt(signal.ellip(8, .2, 70, TOP_HZ, fs=SR, output="sos"), rounded)


dry = scene()
out = record(dry)
write(out)
```